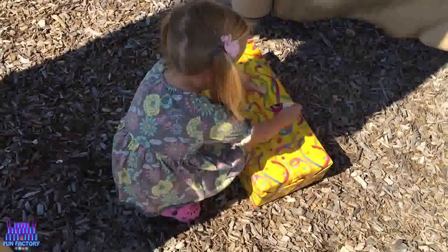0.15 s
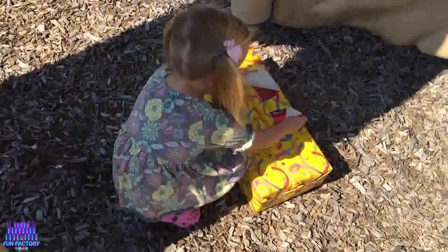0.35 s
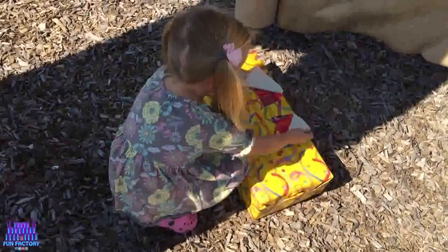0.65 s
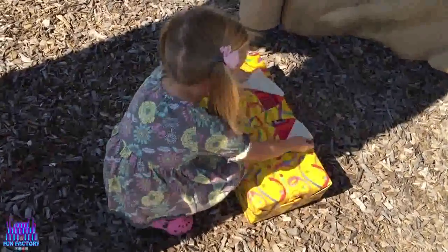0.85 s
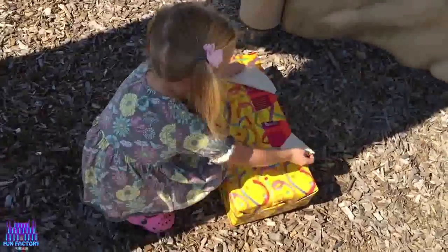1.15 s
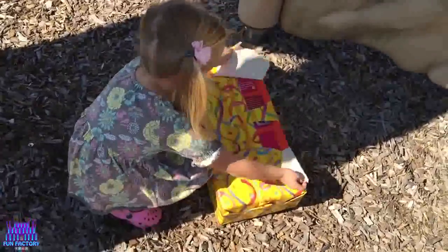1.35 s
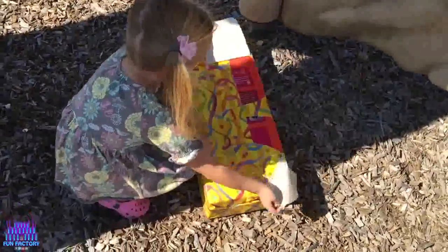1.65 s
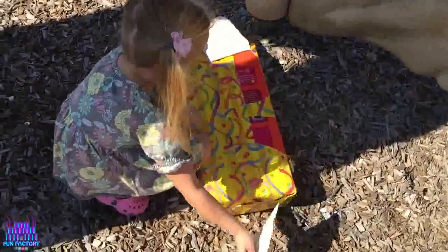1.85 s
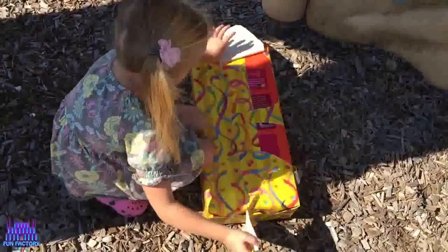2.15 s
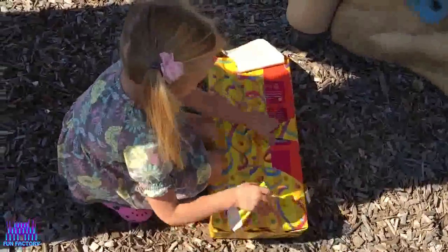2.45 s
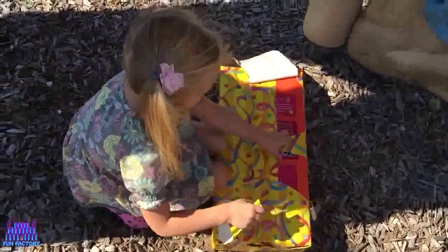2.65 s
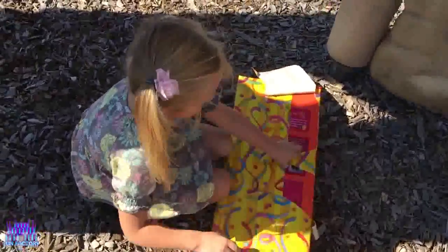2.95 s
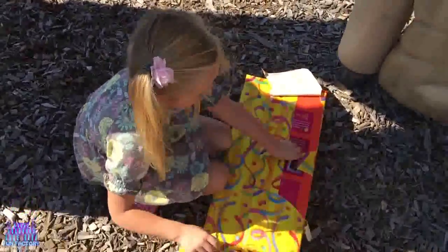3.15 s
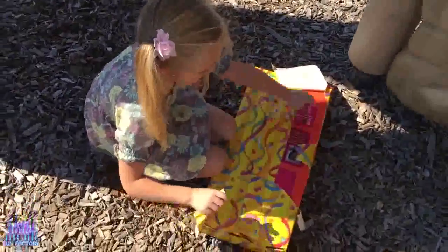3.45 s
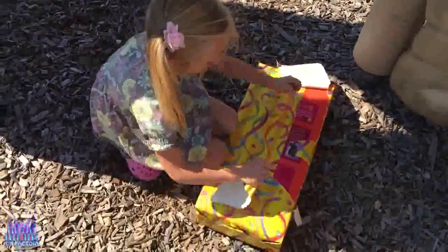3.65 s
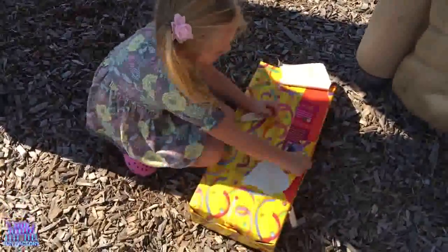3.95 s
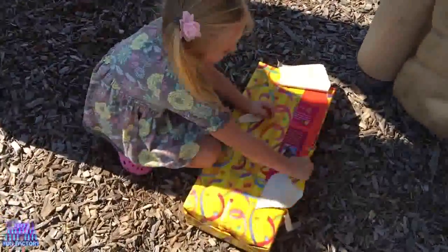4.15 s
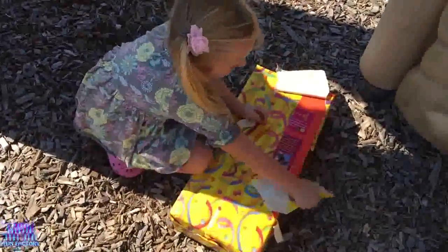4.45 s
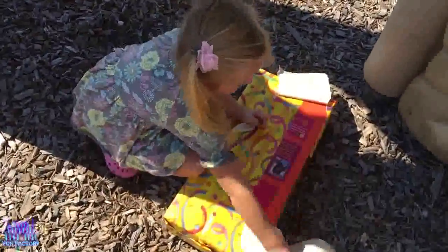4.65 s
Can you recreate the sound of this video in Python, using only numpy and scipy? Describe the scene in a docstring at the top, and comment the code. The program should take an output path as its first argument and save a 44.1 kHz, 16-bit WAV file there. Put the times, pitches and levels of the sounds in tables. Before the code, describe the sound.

Gift wrap is torn off a hollow cardboard box outdoors: quick crackly tugs, one long harsh rip, dull box knocks, then sharp final tears.

```python
"""Wrapping paper is ripped off a cardboard gift box outdoors: short tugs, one long rip, handling, more tears.
Fracture of the fibres in dense bursts excites the resonances of the sheet; creases snap and panels buckle.
Hands knock the hollow box and excite its modes; low-passed noise makes lumps of moving air rumble,
over a quiet open-air hush. The random drifts move in the first half and hold their last value in the second."""
import sys
import numpy as np
from scipy import signal
from scipy.fft import rfft, irfft
from scipy.io import wavfile
from scipy.ndimage import uniform_filter1d

SR = 44100
rng = np.random.default_rng(int(sys.argv[2]) if len(sys.argv) > 2 else 0)


def generate_wav(signal):
    """Clip the signal to [-1, 1] and save it as 16-bit WAV at the path in sys.argv[1]."""
    frames = np.transpose(np.atleast_2d(signal))
    scaled = np.clip(frames, -1, 1) * 32767
    pcm = np.round(scaled).astype(np.int16)
    wavfile.write(sys.argv[1], SR, pcm)


N = 211591
TIME = np.arange(N) / SR


def amp(db):
    """Decibel law: level [dB] to amplitude gain."""
    return 10 ** (np.asarray(db) / 20)


def evened(x):
    """Normalisation of energy: scales to rms 1."""
    return x / np.sqrt(np.mean(x ** 2) + 1e-20)


def read(points, hz):
    """Spectral envelope [dB], interpolated on a log-frequency axis."""
    f, db = np.transpose(points)
    return np.interp(np.log(hz + 1), np.log(f + 1), db)


def add(mix, s, sound):
    """Superposition: mixes a sound in at time s [s]."""
    part = mix[..., max(round(s * SR), 0):][..., :sound.shape[-1]]
    part += sound[..., :part.shape[-1]]


def noise(colour):
    """Spectral shaping: white noise filtered to a given spectrum, rms 1."""
    spectrum = rfft(rng.standard_normal(N))
    return evened(irfft(spectrum * amp(read(colour, np.fft.rfftfreq(N, 1 / SR))), N))


def drift(pace):
    """Low-passed chance, rms 1, at half amplitude by 4 * pace [Hz]; its second half holds one value."""
    f = np.arange(N // 32 + 2) * SR / (2 * N)  # a quarter of the true frequency
    spectrum = rfft(rng.standard_normal(2 * len(f) - 2))
    slow = irfft(spectrum / (1 + (f / pace) ** 4))
    # one slow value per 8 samples lasts to mid-scene; interpolation then repeats the last one
    return evened(np.interp(np.arange(N) / 8, np.arange(len(slow)), slow))


def steadied(x, seconds):
    """Automatic gain: keeps the quick texture of x but holds its rms near 1 over longer stretches."""
    size = max(int(seconds * SR), 1)
    power = uniform_filter1d(uniform_filter1d(x ** 2, size), size)
    return x / np.sqrt(abs(power) + 1e-12)


# spectrum of the open-air hush: (frequency [Hz], relative density [dB per Hz])
HUSH_COLOUR = [(20, -28), (50, -6.5), (100, 0.5), (220, -11), (600, -17.5), (1500, -19.5), (4000, -31),
               (5200, -47), (15500, -40)]


def hush(level_db=-51.5):
    """Stationary random noise: the quiet open-air background."""
    return amp(level_db) * noise(HUSH_COLOUR)


# spectrum of moving air: (frequency [Hz], relative density [dB per Hz])
AIR_SPECTRUM = [(15, -40), (30, -6), (48, 2.5), (75, 3.5), (110, -3.5), (170, -18.5), (300, -25.5),
                (800, -69)]
# puffs of air pushed past the microphone: (time [s], level before the common gain [dB], half length [s])
AIR_PUFFS = [(0.23, -41.5, 0.026), (0.787, -37.5, 0.037), (1.74, -40, 0.029), (2.542, -34.5, 0.084),
             (2.68, -31, 0.034), (2.817, -35, 0.038), (3.04, -35.5, .02), (3.136, -28.5, 0.022),
             (3.32, -37, 0.14), (3.595, -36.5, .035), (3.853, -38.5, 0.15), (4.128, -38, .08),
             (4.263, -33.5, .015), (4.335, -40.5, 0.017), (4.705, -43, .04)]


def air(gain_db=-1.0, lump_db=2.5, lump_pace=14, breeze_db=-48, fade_db_per_s=1.3):
    """Turbulence noise: powers add for a dying light breeze and puffs from the moving arms and paper."""
    power = amp(breeze_db - fade_db_per_s * TIME) ** 2
    for s, db, half_length in AIR_PUFFS:
        power = power + (amp(db) / (1 + ((TIME - s) / half_length) ** 4)) ** 2
    lumps = amp(gain_db + lump_db * drift(lump_pace))
    return np.sqrt(power) * lumps * steadied(noise(AIR_SPECTRUM), 0.032)


def yard(x, t60=0.093, wet_db=-23):
    """Diffuse scattering: a faint, short, dull decay [s per 60 dB] from the ground and things nearby."""
    t = TIME[:SR // 3]
    tail = rng.standard_normal(len(t)) * amp(-60 * t / t60) * (t > .008)
    tail = signal.lfilter([1], [1, -.5], tail)  # dulls the treble
    return x + amp(wet_db) * signal.oaconvolve(x, tail / np.linalg.norm(tail))[:N]


# hands and paper bump the box: (time [s], peak level [dB], centre of the blow, low = soft [Hz], ring time [s])
BOX_KNOCKS = [(0.012, -22, 380, 0.18), (1.005, -31.5, 220, 0.095), (2.235, -31, 410, 0.04),
              (2.477, -18, 417, 0.035), (2.507, -26, 85, .06), (2.548, -13, 275, .062),
              (2.973, -31.5, 290, 0.095), (3.014, -26, 267, 0.083), (3.089, -26.5, 385, 0.08),
              (3.128, -30, 125, .05), (3.228, -26.5, 225, .14), (3.347, -20.5, 356, 0.075),
              (3.38, -17.5, 195, 0.061), (3.484, -20, 224, 0.09), (3.805, -25, 89, .025),
              (3.929, -25, 127, 0.093), (4.075, -19, 165, 0.03), (4.135, -27.5, 123, 0.11),
              (4.176, -29, 105, .08), (4.514, -23, 423, 0.069), (4.643, -32, 200, .088),
              (4.691, -31, 517, .08)]
# modes of the cardboard box: (frequency before detuning [Hz], level [dB], ring time [share of the blow's])
BOX_MODES = [(80.3, 3, 2), (110, 2, 1.14), (150, -1.5, 1.2), (199, 0, 1.1), (269.3, 1, 1.12),
             (314, 2.5, 0.94), (400.5, -7.5, 1.4), (481, -1, 0.95), (607, 6.5, 0.79), (745, 2.5, 0.62),
             (984, 14, 0.62)]


def box(attack=0.00088, blow_octaves=0.66, detune=(0.846, 1.06)):
    """Modal excitation: a blow wakes the box modes near its centre frequency; the grip detunes them."""
    out, t = np.zeros(N), TIME[:SR // 4]
    for s, peak_db, blow_hz, t60 in BOX_KNOCKS:
        ring = np.zeros(len(t))
        for k, (f, db, share) in enumerate(BOX_MODES):
            woken = np.exp(-.5 * (np.log2(f / blow_hz) / blow_octaves) ** 2)
            decay = amp(db - 60 * t / (t60 * share))
            ring += decay * woken * (-1) ** k * np.sin(2 * np.pi * f * rng.uniform(*detune) * t)
        ring = ring * (1 - np.exp(-t / attack))
        add(out, s, amp(peak_db) * ring / abs(ring).max())
    return out


# the long rip down the side of the box:
# (time [s], rasp drive level [dB], then re rasp: flap body [dB], hiss [dB], fizz [dB])
LONG_PULL = [(0.96, -54, 3, 1, 6.5), (1.11, -45, -0.5, -4, 1), (1.18, -34.5, -2.5, -5, -3.5),
             (1.305, -33, -7.5, -5.5, -2.5), (1.34, -22, -10, -12, -11), (1.44, -27.5, -6.5, -4.5, -7.5),
             (1.55, -24.5, -1, -3.5, -4), (1.77, -29.5, -7, -5, -1), (1.9, -25.5, -5, -2.5, -1.5),
             (1.97, -38, -1.5, 1.5, 1.5), (2.091, -42.5, -5.5, 1.5, 1.5)]
# shorter tugs, tears and slides of the hand: (start [s], hardest [s], end [s], rasp drive level at hardest [dB],
# then re rasp: flap body [dB], hiss [dB], fizz [dB])
SHORT_PULLS = [(0.0, 0.006, 0.18, -39.5, 5.5, 0.5, 3), (0.151, 0.178, 0.19, -30.5, -6, 1, -8),
               (0.212, 0.307, 0.32, -38, -0.5, 6, 2.5), (0.314, 0.386, 0.47, -30.5, -3, 3, -2),
               (0.487, 0.5, 0.51, -37, -2.5, 6, 2), (0.533, 0.609, 0.66, -31.5, 2, 0, 0),
               (0.674, 0.79, 0.85, -42.5, -3.5, -4.5, 5), (2.175, 2.193, 2.23, -41, -0.5, -5, -10),
               (2.25, 2.375, 2.52, -56.5, 6, -8, -9), (2.538, 2.56, 2.626, -47.5, 3, 2, -3),
               (2.641, 2.66, 2.694, -41.5, -0.5, 2.5, 1), (2.88, 2.945, 2.96, -61, 4, 0, 3),
               (3.089, 3.103, 3.144, -39, 6, -5, -10), (3.17, 3.192, 3.28, -47.5, 8.5, -6, -7),
               (3.26, 3.282, 3.38, -44, 5, -2, -2), (3.34, 3.35, 3.402, -37, 3.5, -2.5, 0.5),
               (3.439, 3.463, 3.502, -26.5, -9, -4, -9), (3.509, 3.537, 3.553, -30, -3.5, -7.5, -10),
               (3.572, 3.605, 3.675, -48, 6, -5, -5.5), (3.755, 3.775, 3.8, -50, -4.5, -2, -8),
               (3.8, 3.83, 3.92, -60.5, -5, 1, 0), (4.026, 4.064, 4.14, -48, -3, -2, -4),
               (4.066, 4.081, 4.1, -38, 3, -1, -4), (4.145, 4.224, 4.24, -41, -6.5, -5, -6),
               (4.255, 4.42, 4.51, -44.5, 1.5, -4, -5), (4.515, 4.53, 4.53, -22.5, -4, -8.5, -4.5),
               (4.603, 4.655, 4.63, -32.5, 1, -9, -5), (4.68, 4.694, 4.81, -24.5, -5, -3.5, 1),
               (4.729, 4.786, 4.86, -26.5, 0, 4, 6.5)]
# the held sheet never quite stops rustling: drive levels of (body [dB], rasp [dB], hiss [dB], fizz [dB])
RESTING_LEVELS = [-65, -67.5, -68, -69]


def pull(grip_s=0.0065, release_s=0.016, swell_db=7):
    """Energy summation: the pulls of the hands add in power to give four register levels [dB]."""
    t = TIME[::32]

    def held(start, end, level_db, body_db, hiss_db, fizz_db):
        """Exponential onset and release: power of the four registers during one pull."""
        grip = np.exp(-np.maximum(start - t, 0) / grip_s - np.maximum(t - end, 0) / release_s)
        return np.array([(grip * amp(level_db + db)) ** 2 for db in (body_db, 0, hiss_db, fizz_db)])

    s, *columns = np.transpose(LONG_PULL)
    long_rip = held(s[0], s[-1], *(np.interp(t, s, column) for column in columns))
    power = amp(RESTING_LEVELS)[:, None] ** 2 + long_rip
    for start, hardest, end, level_db, *colour in SHORT_PULLS:
        # swells to its hardest moment, then eases
        below_hardest = swell_db * np.interp(t, [start, hardest, end], [1, 0, 1])
        power = power + held(start, end, level_db - below_hardest, *colour)
    return np.array([np.interp(TIME, t, db) for db in 10 * np.log10(power)])


def peeled(body, lift_db=-5.0, corner_hz=420, ease_s=0.25):
    """Loss of coupling: while the long rip holds the flap clear of the box, it loses the box's boom."""
    start, end = LONG_PULL[0][0], LONG_PULL[-1][0]
    lifted = np.clip(np.minimum(TIME - start, end - TIME) / ease_s, 0, 1)
    boom = signal.sosfiltfilt(signal.butter(2, corner_hz, fs=SR, output="sos"), body)
    return body + (amp(lift_db * lifted) - 1) * boom


def fibres(per_s, spread_db, bed):
    """Shot noise: clicks of breaking fibres, a few of them large, over a bed of rubbing."""
    size = amp(spread_db * np.minimum(rng.exponential(1, N), 3))
    clicks = size * rng.choice([-1, 1], N) * (rng.random(N) < per_s / SR)
    return evened(clicks) + bed * rng.standard_normal(N)


def tearing(levels, slip_pace=170, slip_db=3.0, catch_pace=50, catch_db=2.0, own_db=1.0, smooth_above_db=-39):
    """Stick-slip fracture: the tear front catches and slips, so fibres break in clumps; four drives."""
    # in a fast, loud rip the breaks run together; slow handling crackles more
    fast = np.tanh((levels[1] - smooth_above_db) / 9)
    unevenness_db = slip_db * drift(slip_pace) + catch_db * drift(catch_pace)
    clumps = amp((1 - 0.49 * fast) * unevenness_db)
    breaks = steadied(fibres(per_s=8000, spread_db=3.2, bed=.8 + .5 * fast) * clumps, .025)
    return np.array([breaks * amp(db + own_db * drift(catch_pace)) for db in levels])


# sudden short rips and crease snaps: (time [s], rasp drive level [dB], then re rasp: flap body [dB],
# treble before its split [dB]; rise [s], nominal length [s])
CREASE_SNAPS = [(0.167, -18.5, -23, -4, 0.0012, .007), (0.2122, -29, -1, 3, .002, .011),
                (0.261, -22.5, -18, -3, 0.0024, 0.0066), (0.2774, -28, -11, -4, .002, 0.0071),
                (0.729, -39, 7, 2.5, .0005, 0.0069), (0.7425, -44, 3, 1, .0017, .0047),
                (0.765, -36, -13, 2, .002, 0.0029), (0.7828, -38.5, -7, 6, .003, .004),
                (0.7966, -42.5, 1, 8, .0013, 0.0047), (0.8692, -25, -13, 0, 0.0032, 0.0051),
                (0.9305, -50, 2, 12, .003, .008), (0.9675, -36, -4, -4, .006, 0.012),
                (1.1325, -28.5, -9.5, -5.5, 0.00092, 0.014), (1.147, -29, -24, -2.5, 0.0066, 0.0075),
                (1.227, -25, -19, -13, .002, 0.019), (1.2577, -19, -20, -12, 0.0011, 0.0041),
                (1.2832, -17.5, -22, -13, .0005, 0.0063), (1.313, -15.5, -27, -13, .001, .006),
                (1.492, -23.5, 0, -6, .007, 0.013), (1.879, -22, -3.5, -3, 0.0057, 0.012),
                (2.1804, -34.5, -1, -11, 0.00082, 0.0074), (2.2186, -30.5, -13, -8, .001, 0.004),
                (2.4758, -39, 10.5, -2, 0.0022, 0.0089), (2.543, -41, 8, 1, .004, 0.02),
                (2.67, -32, 3.5, -0.5, 0.00076, 0.014), (3.014, -51, 11.5, -17, .001, 0.0078),
                (3.09, -36.5, -11, -1.5, 0.0012, .013), (3.2209, -20, 0.5, 5.5, 0.0063, .0095),
                (3.2565, -24, -5, -1, 0.0016, .011), (3.289, -35, 3, 0, 0.0054, 0.012),
                (3.309, -27.5, -3, -0.5, .007, 0.012), (3.3306, -26, 0.5, 1, 0.0019, 0.0046),
                (3.3452, -10.5, -24, -8, 0.00079, .002), (3.3787, -28, 3.5, -3, 0.0028, 0.0065),
                (3.4144, -27.5, -10, -11, .004, 0.0046), (3.4495, -16, -18.5, -7.5, 0.0013, .012),
                (3.4814, -19.5, -16, -6, 0.0034, 0.0048), (3.523, -23, -6, -6.5, 0.0053, 0.012),
                (3.5382, -26.5, -9, -4, 0.0027, 0.0081), (3.597, -32, 1.5, -13, 0.0046, .006),
                (3.7543, -43, -14, -7, .002, .0045), (4.046, -29, -12, -9.5, 0.0031, 0.0044),
                (4.265, -29.5, -12, -13, .004, .011), (4.299, -22, -6.5, -4, 0.00092, 0.0046),
                (4.333, -23.5, -13, -15, .002, 0.0038), (4.3653, -32.5, 2, 5, .001, 0.0035),
                (4.3928, -26, -20, -7.5, .0025, 0.0055), (4.4349, -25, -9, -6.5, .0017, 0.0052),
                (4.4895, -23, -14, -2, .003, .0045), (4.5125, -7.5, -12.5, -6, 0.0058, 0.01),
                (4.527, -8, -20, -16, 0.0019, 0.008), (4.543, -19.5, -10, -4, 0.0086, 0.014),
                (4.5795, -20, -6, -2, .004, 0.0099), (4.617, -19.5, -10, -5, 0.0075, .016),
                (4.64, -20.5, -5.5, -6.5, 0.0014, 0.019), (4.677, -17.5, -8, -7, 0.0082, 0.014),
                (4.6943, -16, 3.5, -16, 0.0034, 0.0038)]


def snapping(own_db=0.77, own_pace=150, crack=5.0, crack_rise=0.0014, fold_echo=0.46, fold_s=.0005,
             hiss_db=1, fizz_db=-0.5):
    """Avalanche fracture: each snap is a burst of fibres that swells and dies within milliseconds."""
    drives = np.zeros((4, N))
    breaks = steadied(fibres(per_s=9800, spread_db=5.0, bed=0.62), 0.0018)
    t = TIME[:SR // 10]
    fold_distances = rng.uniform(.4, 1.6, len(CREASE_SNAPS))
    for (s, level_db, body_db, treble_db, rise, length), far in zip(CREASE_SNAPS, fold_distances):
        decay = max(length - rise, .0005)
        burst = np.minimum(t / rise, 1) * np.exp(-np.maximum(t - rise, 0) / decay)
        burst = burst * np.roll(breaks, -round(s * SR))[:len(t)]
        # an abrupt snap opens with one clean crack as the crease buckles
        burst[min(int(rise * SR / 2), len(t) - 1)] += crack * np.exp(-rise / crack_rise)
        # the wave turns back at the nearest fold, which gives each snap its own colour
        echo = np.pad(burst, (int(far * fold_s * SR), 0))[:len(t)]
        burst = (burst - fold_echo * echo) / np.hypot(1, fold_echo)
        registers_db = level_db + np.array([body_db, 0, treble_db + hiss_db, treble_db + fizz_db])
        add(drives, s, amp(registers_db)[:, None] * burst)
    return np.array([drive * amp(own_db * drift(own_pace)) for drive in drives])


def crinkling(levels, crinkle_db=-3., spread_db=3., swell_s=.0014, own_db=3.0, slack_db=4.0, count=170):
    """Random yielding: small creases give way about as loud as the pull; more so in slack paper."""
    drives, t = np.zeros((4, N)), TIME[:SR // 40]
    levels = levels - slack_db * evened(levels[1] - levels[1].mean())
    swell = t / swell_s * np.exp(1 - t / swell_s)
    for k, (when, size, *colour) in enumerate(rng.uniform(0, 1, (count, 6))):
        at = int((k + when) / count * (N - 1))  # one at random in each of count equal slots
        db = levels[:, at] + crinkle_db - spread_db * np.log(max(size, .08))
        db = db + own_db * (2 * np.array(colour) - 1)
        add(drives, at / SR, amp(db)[:, None] * swell * rng.standard_normal(len(t)))
    return drives


# the flap buckles outright in a cluster of hollow pops:
# (time [s], level of each pop before its envelope [dB], central pitch [Hz], length [s])
BUCKLE_CLUSTERS = [(0.01, -23, 1410, .028), (1.034, -36, 996, 0.015), (3.104, -28, 1500, .03),
                   (3.133, -24, 1750, .016), (3.19, -29, 1500, .026), (3.527, -26, 1540, .014),
                   (3.644, -34.5, 1300, 0.015)]


def buckling(body_db, pop_db=-4.5, spread_db=3.0, cycles=11.7, low_hz=620, high_hz=2200,
             scatter=0.248, cluster_cycles=3.36, count=420):
    """Snap-through instability: small panels flip and ring briefly, as hard as the flap is being flexed."""
    out, t = np.zeros(N), TIME[:SR // 20]

    def pop(start, db, hz, cycles):
        """Damped oscillation: one panel flips and rings, its decay set in cycles per factor e."""
        envelope = np.exp(-hz * t / cycles) * (1 - np.exp(-hz * t))
        add(out, start, amp(db) * np.sin(2 * np.pi * hz * t) * envelope)

    for when, pitch, size in rng.random((count, 3)):
        db = body_db[int(when * N)] + pop_db - spread_db * np.log(max(size, .05))
        pop(when * N / SR, db, low_hz * (high_hz / low_hz) ** np.sqrt(pitch), cycles)
    for s, db, hz, length in BUCKLE_CLUSTERS:
        for k, detune in enumerate(rng.standard_normal(size=9)):
            pop(s + length * k / 9, db, hz * np.exp(scatter * detune), cluster_cycles)
    return out


# resonances of the sheet lying on the box: (frequency [Hz], width [Hz], boost [dB])
SHEET_MODES = [(265, 165, 8.5), (1170, 120, 1.5), (1510, 160, 2.5), (1860, 270, 5), (3240, 400, 5),
               (3650, 190, 4), (4046, 570, 4), (4420, 370, 2), (6490, 1400, 4.5), (8240, 510, 0.5)]
# the four registers of the paper, low to high: (frequency [Hz], relative density [dB per Hz])
BODY_COLOUR = [(40, -39), (130, -8), (220, -4), (320, -2.5), (600, -1.5), (1100, 1.5), (2000, .5),
               (2750, -7.5), (3400, -59), (6000, -57)]
RASP_COLOUR = [(800, -36), (2100, -12.5), (2750, -2), (3100, 6), (4500, 6), (5100, -8.5), (5900, -42),
               (10000, -58)]
HISS_COLOUR = [(2000, -79), (4400, -21.5), (5400, -0.5), (7500, -0.5), (9200, -3), (10300, -12.5),
               (14000, -22)]
FIZZ_COLOUR = [(5000, -55), (8600, -11), (9700, -3.5), (10500, -3), (11500, 2.5), (13000, 2.5),
               (15800, -.5)]


def sheet_rings():
    """Minimum-phase impulse response of the sheet, split in four registers of energy 1 that stay in phase."""
    hz = abs(np.fft.fftfreq(2048, 1 / SR))
    modes_db = sum(boost / (1 + (2 * (hz - f) / width) ** 2) for f, width, boost in SHEET_MODES)
    registers = (BODY_COLOUR, RASP_COLOUR, HISS_COLOUR, FIZZ_COLOUR)
    gains = np.array([amp(read(register, hz) + modes_db) for register in registers])
    causal_phase = -signal.hilbert(np.log(gains.sum(0))).imag
    rings = np.fft.fftshift(np.fft.ifft(gains * np.exp(1j * causal_phase)).real, axes=1)
    return rings / np.linalg.norm(rings, axis=1, keepdims=True)


def panels(x, swing_db=2.0, swing_pace=22, count=11):
    """Band-wise modulation: panels between the creases, each with its own pitch, tighten and slacken."""
    octave = np.log2(np.fft.rfftfreq(N, 1 / SR) + 1)
    centres, spectrum = np.linspace(np.log2(300), np.log2(2600), count), rfft(x)
    out = np.zeros(N)
    for one in np.eye(count):
        band = irfft(spectrum * np.interp(octave, centres, one), N)
        out += band * evened(amp(swing_db * np.clip(drift(swing_pace), -2, 2)))
    return out


def flap_echoes(x, share, longest, move_pace, count):
    """Comb interference: close reflections between flap, box and ground vary as the sheet bends."""
    delays = longest * (np.arange(count) + rng.uniform(.3, 1, count)) / count
    echoes = sum(np.pad(x, (int(d * SR), 0))[:N] * drift(move_pace) for d in delays) / np.sqrt(count)
    return (x + share * echoes) / np.sqrt(1 + share ** 2)


def paper(flex_db=-1.):
    """Source-filter principle: tears, snaps and crinkles ring the sheet's flex, rasp, hiss and fizz."""
    levels = pull()
    drives = tearing(levels) + snapping() + crinkling(levels)
    body, rasp, hiss, fizz = signal.oaconvolve(drives, sheet_rings(), "same", axes=1)
    flex = amp(flex_db) * panels(peeled(body))
    sheet = flex + buckling(levels[0]) + rasp + hiss + fizz
    return flap_echoes(sheet, share=0.44, longest=.004, move_pace=13.0, count=14)


def scene(width_db=-17, memory_s=0.026):
    """Mid-side stereo: all sits in the middle; only the treble of sudden attacks has a trace of width."""
    mid = yard(paper() + box()) + air() + hush()
    treble = signal.sosfilt(signal.butter(8, 4500, "high", fs=SR, output="sos"), mid)
    power = abs(uniform_filter1d(treble ** 2, size=400)) + 1e-14
    step = 1 / (memory_s * SR)
    remembered = abs(signal.lfilter([step], [1, step - 1], power))
    # opens once the treble exceeds about its recent rms
    sudden = np.clip(1 - amp(6) / 2 * np.sqrt(remembered / power), 0, 1)
    delayed = np.pad(treble, (SR // 700, 0))[:N]
    side = amp(width_db) * uniform_filter1d(sudden, size=100) * delayed
    return np.array([mid + side, mid - side])


def record(dry, edge_hz=15950):
    """Band limitation: full-scale ceiling, then a linear-phase low-pass."""
    low_pass = signal.firwin(801, edge_hz, window=("kaiser", 8), fs=SR)
    return signal.oaconvolve(np.clip(dry, -1, 1), low_pass[None], "same", axes=1)


dry = scene()
out = record(dry)
generate_wav(out)
```